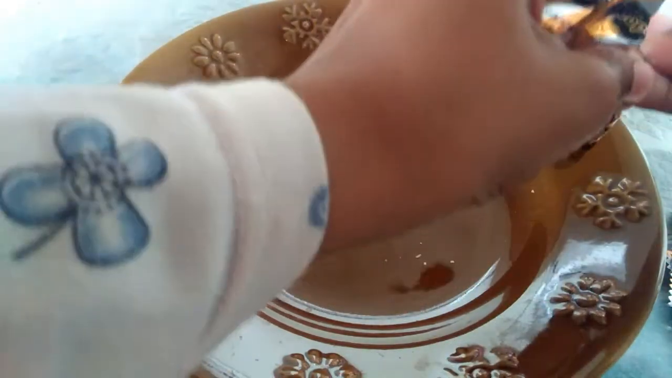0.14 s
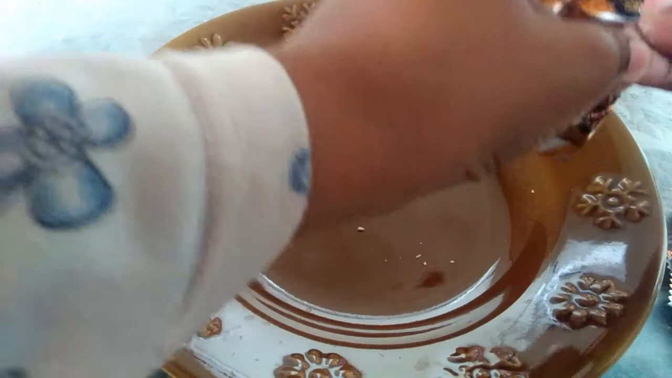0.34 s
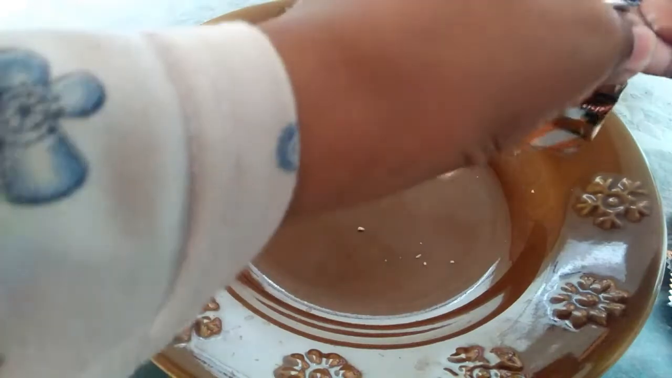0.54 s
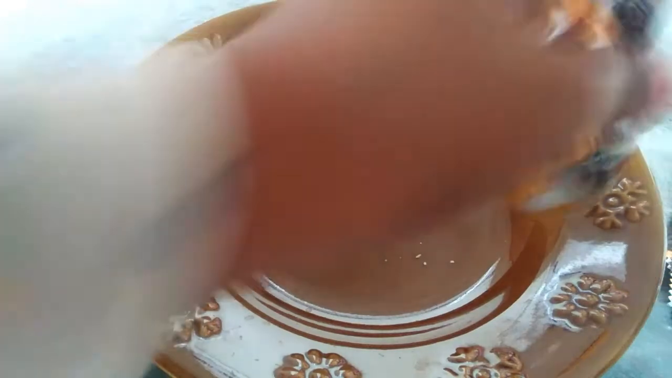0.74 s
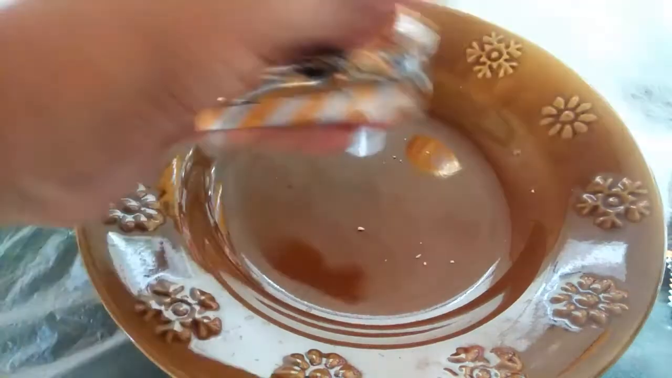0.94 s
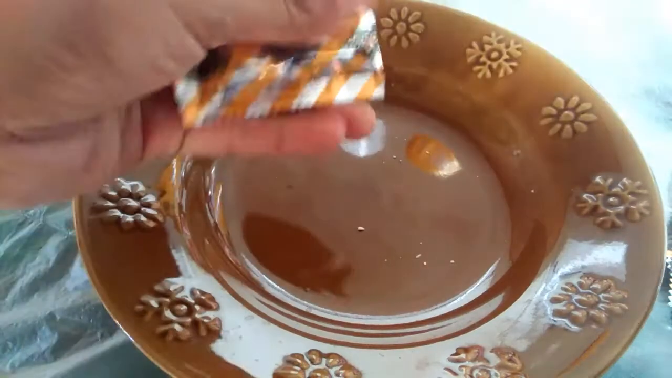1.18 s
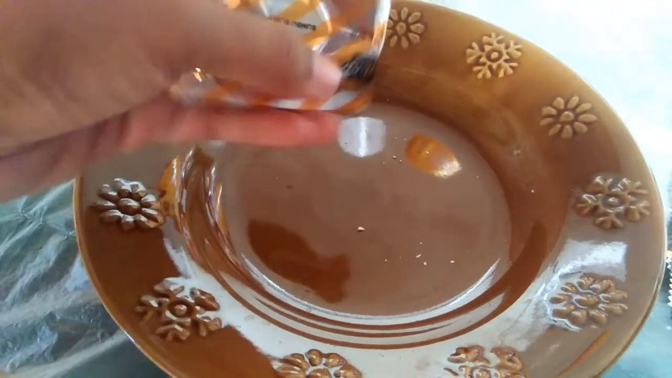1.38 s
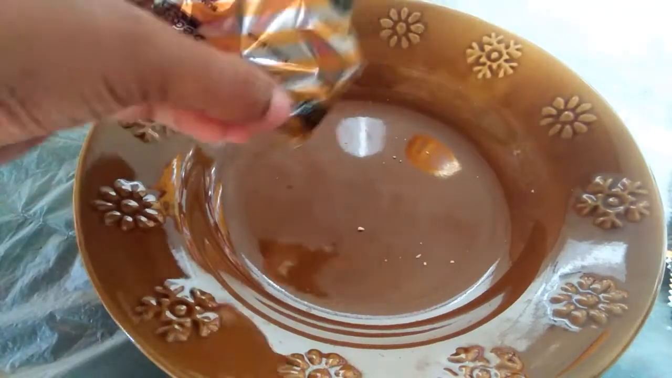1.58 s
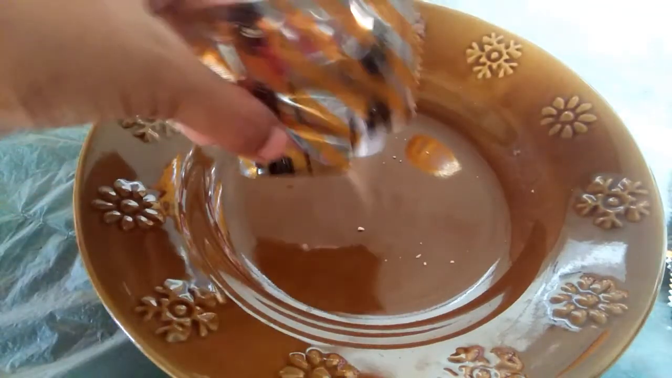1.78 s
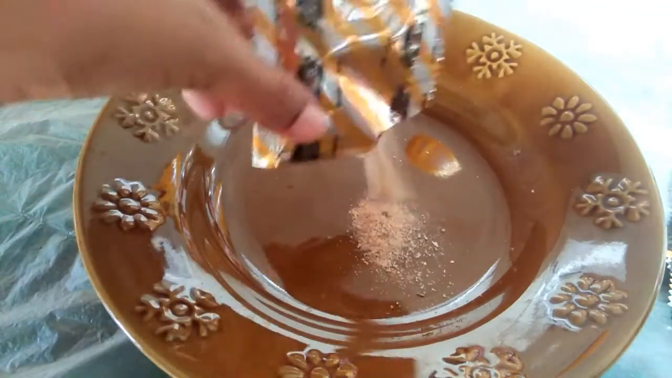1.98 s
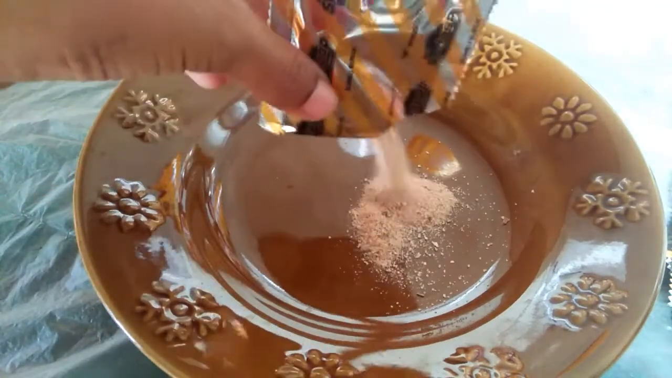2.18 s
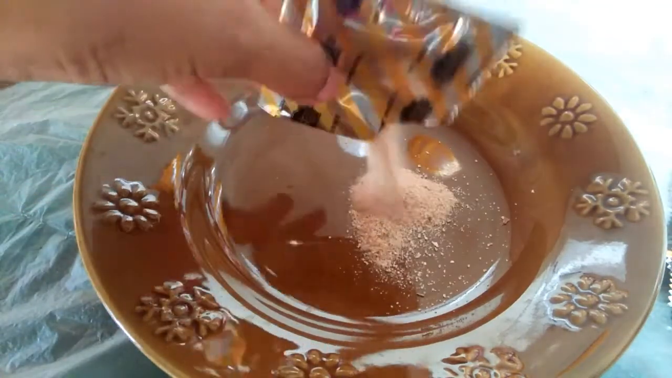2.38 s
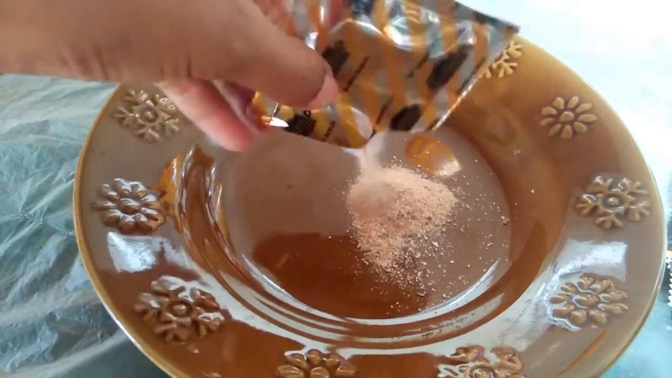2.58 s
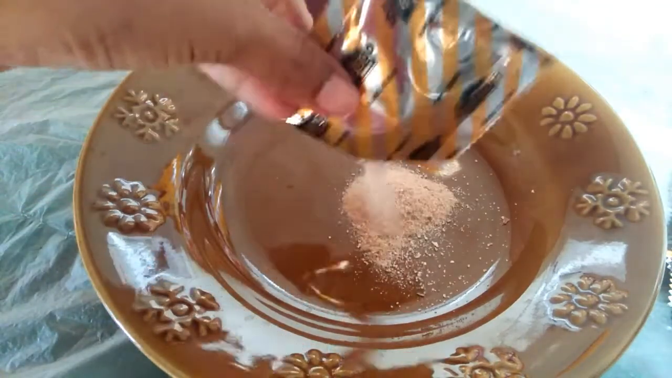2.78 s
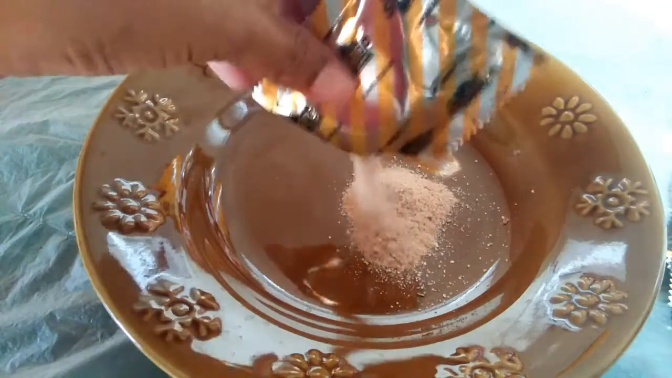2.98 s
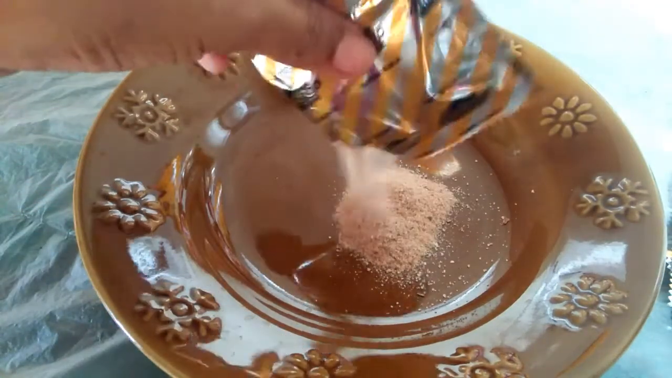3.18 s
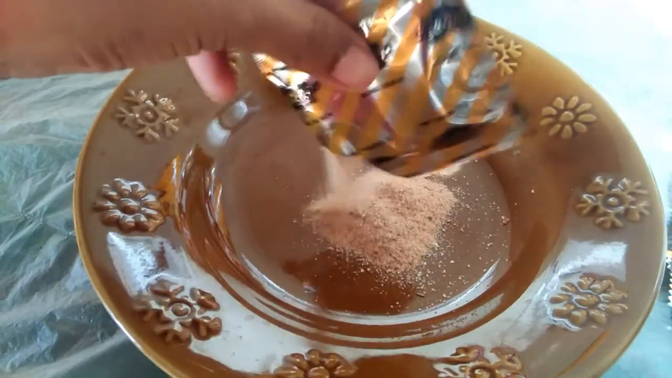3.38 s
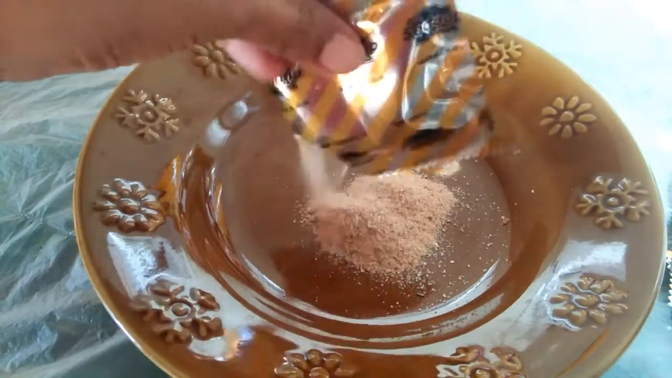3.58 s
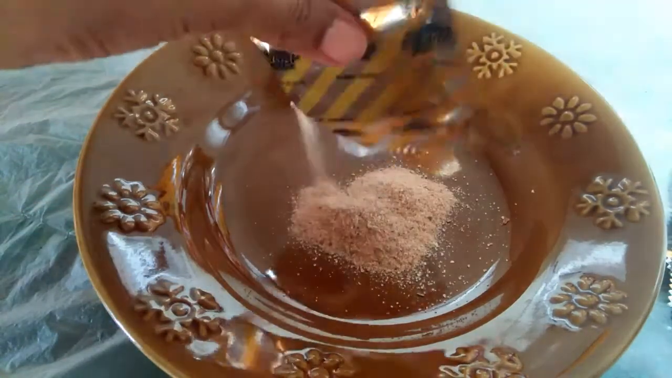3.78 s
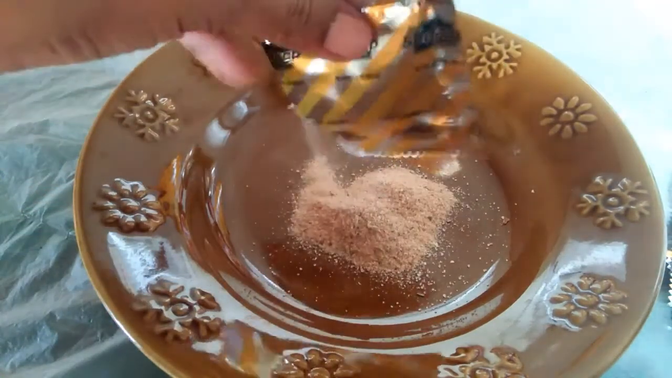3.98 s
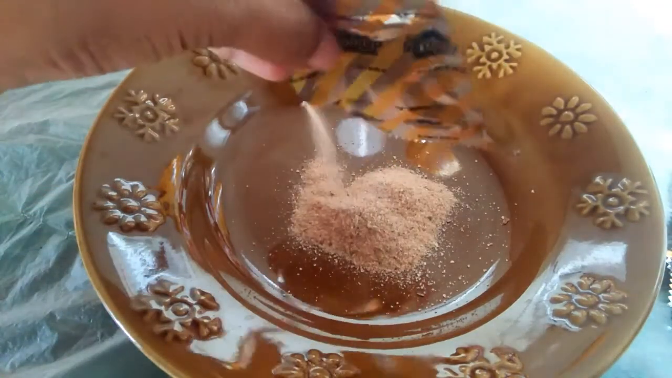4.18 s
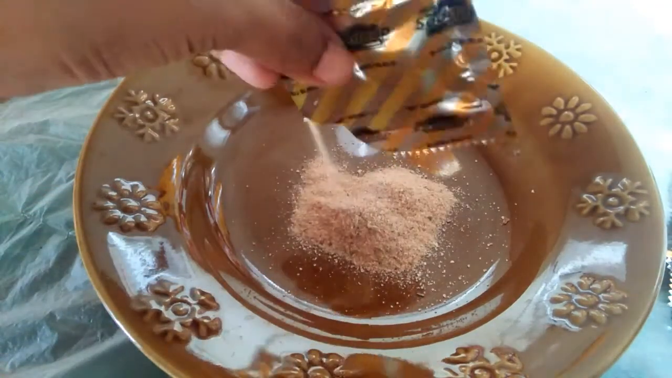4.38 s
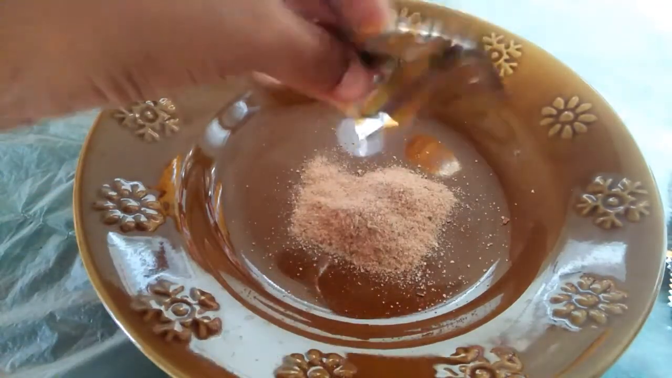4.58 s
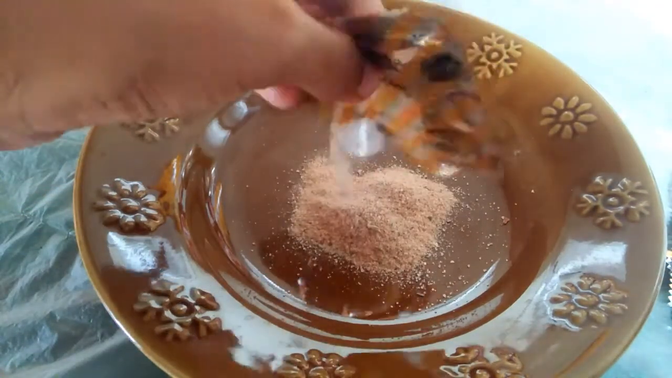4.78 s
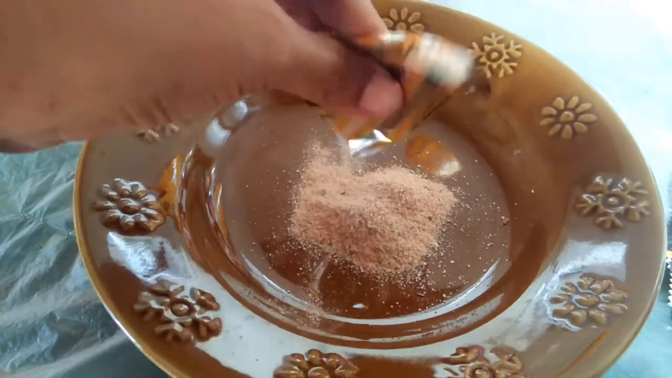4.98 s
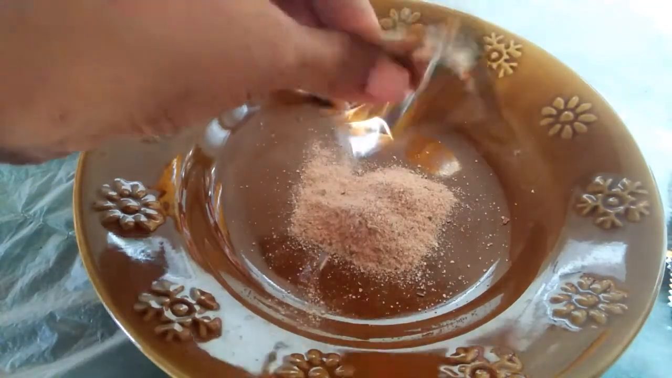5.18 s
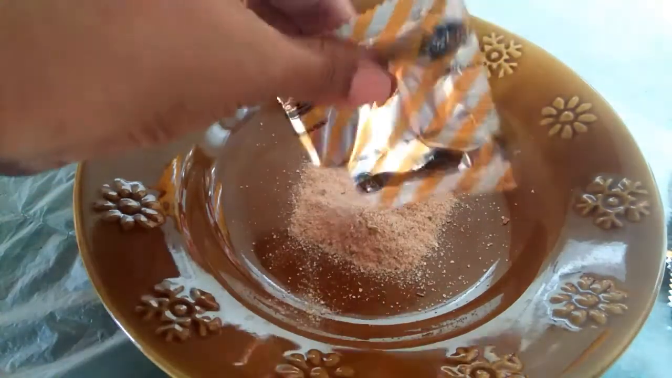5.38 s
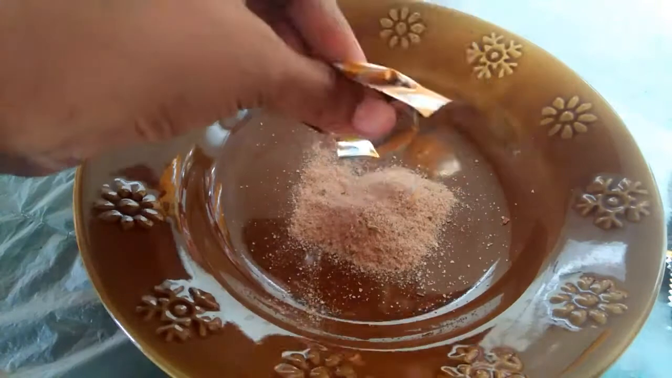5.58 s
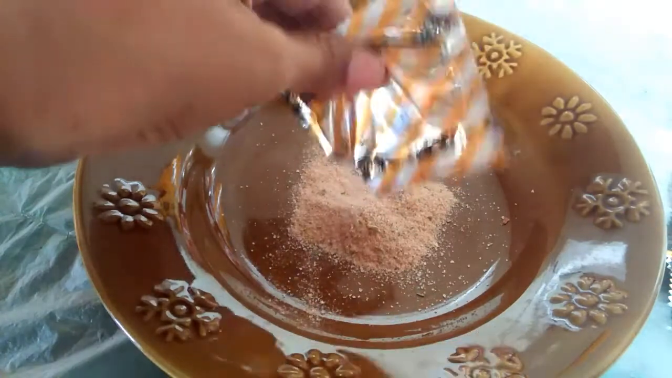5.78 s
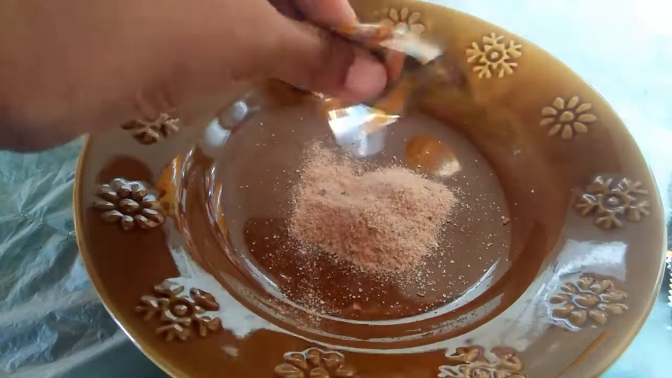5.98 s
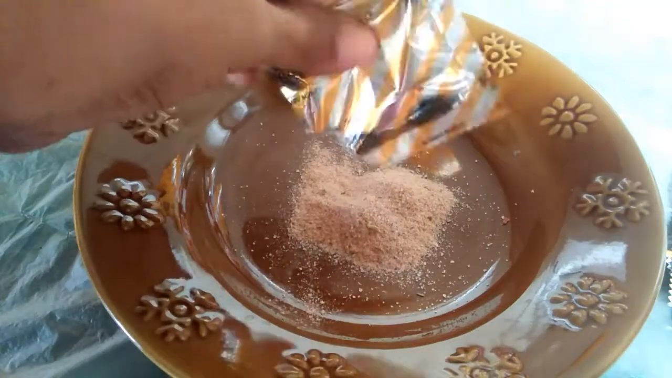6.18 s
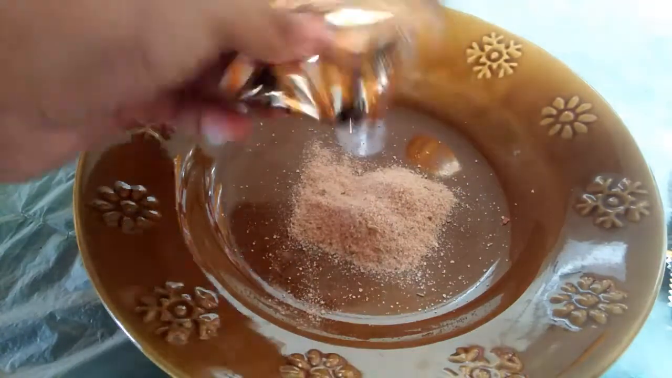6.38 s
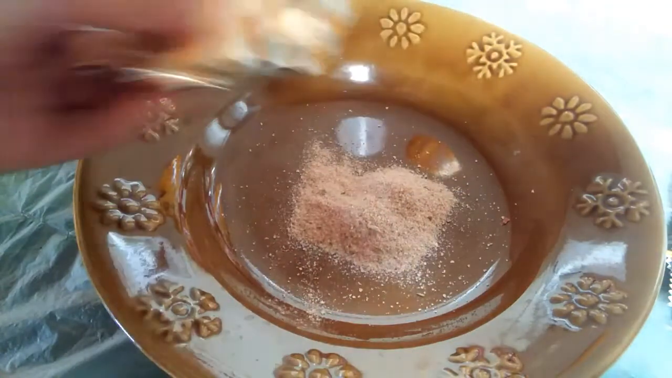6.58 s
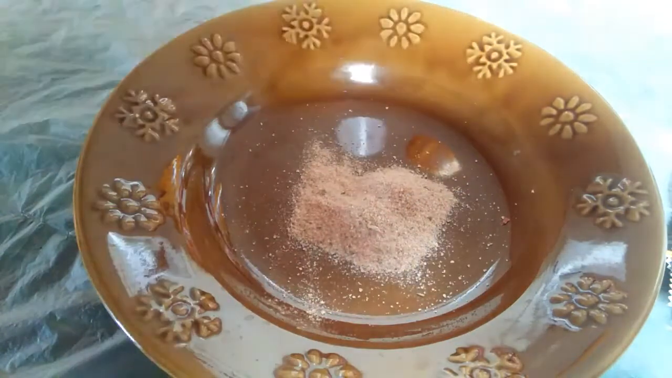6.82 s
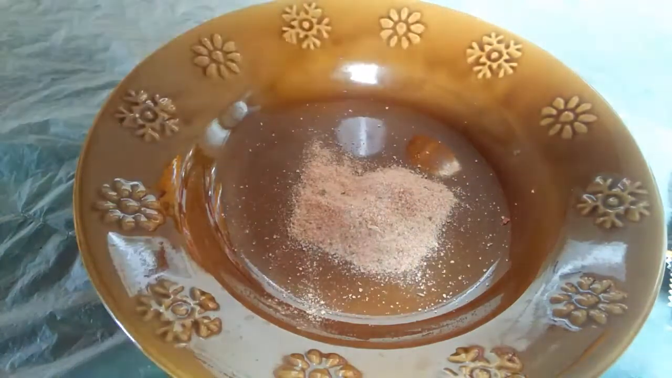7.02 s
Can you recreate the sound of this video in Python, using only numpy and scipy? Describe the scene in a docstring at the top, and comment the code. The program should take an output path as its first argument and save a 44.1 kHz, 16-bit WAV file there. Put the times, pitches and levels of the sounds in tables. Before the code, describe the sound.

Close up, a foil sachet rips open with one sharp snap and bump, powder hisses out softly, then the film crackles brightly as it is shaken.

```python
"""In a kitchen, close to a phone, a foil sachet of seasoning is pulled open, tipped over a plate and shaken
empty. The film buckles in sharp snaps and fine crackle, made of noise bursts shaped by the foil's resonances;
dense random ticks give its rustle and the hiss of powder sliding down it. A low bump comes with the pull, and a
dish, built from decaying modes, knocks on the table. Behind lie a low rumble as the phone shifts in the hand, a
faint wash, one long far call like a rooster's and a fainter falling tone."""
import sys
import numpy as np
from scipy import signal
from scipy.fft import rfft, irfft
from scipy.io import wavfile
from scipy.ndimage import uniform_filter1d

SR = 44100
rng = np.random.default_rng(int(sys.argv[2]) if len(sys.argv) > 2 else 0)


def store_pcm(level_fs):
    """Save levels as 16-bit WAV."""
    pcm = np.round(np.clip(level_fs, -1, 1) * 32767).astype(np.int16)
    wavfile.write(sys.argv[1], SR, np.atleast_2d(pcm).T)


N = 310905
TIME = np.arange(N) / SR

# loudest creases popping through, and at 0.908 s the sharp crack of the dish's hard knock: (t/s, rms level of
# first 4 ms/dB, nominal ring time/ms, facet resonance f/Hz, treble shelf level/dB)
SNAPS = [(0.8204, -45, 1.4, 1800, 1), (0.8421, -9.5, 1.6, 920, 1.5), (0.908, -21.5, 3.6, 1600, -7.5),
         (1.054, -32, 1.7, 11200, -2.5), (1.0587, -34.5, 0.96, 5400, 12), (1.0684, -28.5, 0.55, 4550, 9),
         (1.116, -17, 1, 9800, -7.5), (1.1438, -33, 1.5, 7900, -7), (1.187, -34.5, 2.2, 1780, 1),
         (1.203, -38.5, 4, 1810, -6), (1.319, -34, 3.3, 4800, -3.5), (1.429, -48.5, 2.1, 3700, -6),
         (1.562, -43.5, 1.7, 9440, -13), (1.808, -41.5, 3.7, 9500, -12.5), (1.873, -28, 0.78, 3450, -1.5),
         (2.4333, -38.5, 7.9, 1200, 0), (2.8338, -35, 5.4, 1230, -6), (2.9284, -52.5, 0.95, 8000, -6),
         (3.1084, -52, 1.3, 1400, -4), (3.2693, -34.5, 5, 8000, -1.5), (3.391, -43.5, 5.4, 9150, -2),
         (3.6485, -42.5, 0.92, 8100, -3), (3.8707, -34.5, 2, 6170, 9), (3.886, -31.5, 1.2, 8030, -6),
         (3.984, -42, 1.8, 2800, 1), (4.0069, -39.5, 1.03, 9500, 8), (4.2751, -30, 1.7, 6600, 0),
         (4.3563, -37, 3.3, 1520, -1), (4.4968, -43.5, 3.3, 5900, -1), (4.5595, -41.5, 2.1, 11400, 4),
         (4.6632, -35, 22, 6200, 4), (4.6816, -29.5, 3.9, 3440, 6), (4.7585, -43.5, 2.9, 2780, -7),
         (4.765, -29.5, 1.2, 9800, -8.5), (4.885, -21.5, 0.61, 12200, -1), (4.9861, -28.5, 1.9, 4500, 2),
         (5.05, -29.5, 1.6, 5900, 16), (5.0563, -23.5, 0.92, 10800, -2), (5.071, -25, 0.37, 5700, 0),
         (5.089, -23, 2, 9000, 2.5), (5.144, -37.5, 0.64, 7800, -11), (5.1786, -28, 5.8, 11900, -5),
         (5.3118, -29.5, 2.9, 2570, -4.5), (5.339, -30.5, 9.8, 1190, -5), (5.361, -28.5, 5.4, 6800, -1),
         (5.371, -17.5, 4.6, 13200, -6.5), (5.4198, -22, 3.3, 11700, -7.5), (5.4318, -31, 6.8, 1470, -4),
         (5.444, -21, 1.8, 6230, -7.5), (5.5238, -31.5, 7.6, 3220, 2), (5.6219, -26, 11, 10900, -9),
         (5.6322, -22, 4.2, 1760, 1), (5.6459, -16.5, 3.1, 1290, 6.5), (5.6946, -13.5, 3.2, 5440, -0.5),
         (5.7005, -22.5, 2.9, 12400, -10.5), (5.8609, -19.5, 3, 1240, 2), (5.9019, -20, 3.2, 1680, -4.5),
         (5.925, -27, 3.5, 1750, -10), (6.021, -28.5, 2.7, 4030, 13), (6.0353, -27, 1.5, 9000, -13),
         (6.044, -31.5, 2.3, 8600, 0), (6.0886, -28, 8.8, 1290, -1), (6.1007, -18.5, 4.4, 9300, -8),
         (6.1507, -23.5, 1.3, 4900, 5.5), (6.325, -19.5, 7.6, 1780, 6.5), (6.3771, -21.5, 6.2, 12400, -5),
         (6.396, -18, 0.94, 6170, -9.5), (6.4393, -29, 1.8, 3250, -3), (6.471, -28.5, 1.9, 4000, 6.5),
         (6.512, -33, .9, 4330, 10.5), (6.6119, -33.5, 3.6, 3520, 4), (6.923, -38, .7, 6500, 13.5)]
# base colour of a snap radiated by the film: (f/Hz, level/dB)
FOIL_COLOUR = [(100, -20), (300, -18), (700, -15), (1280, -10), (2400, -11), (4200, -11.5), (5600, -5),
               (7000, -4), (9200, 3), (10400, 0), (11600, -6), (14000, -10), (16000, -24.5)]
# colour of film rubbing: (f/Hz, level/dB)
RUSTLE_COLOUR = [(200, -23), (500, -14), (1250, -11), (2500, -12.5), (4300, -9.5), (6500, -11.5),
                 (9300, -1.5), (11500, -8.5), (14000, -13), (16000, -29.5)]
# colour of grains on foil: (f/Hz, level/dB)
POWDER_COLOUR = [(600, -27), (1300, -17.5), (3000, -18.5), (4000, -21), (5200, -14), (7500, -11),
                 (9200, -2), (11300, -11), (14000, -17), (16000, -28)]
# squeezes and shakes that flex the sachet, before each layer's trim: (t/s, length/s, starting level/dB)
FLEXES = [(0.0, 0.024, -71.5), (0.09, 0.092, -73.5), (0.405, 0.027, -63), (0.72, .03, -74.5),
          (0.848, 0.074, -36.5), (0.93, 0.076, -48.5), (1.12, 0.1, -51.5), (1.29, 0.033, -50),
          (1.41, 0.074, -57), (1.555, 0.025, -55), (1.68, 0.028, -61.5), (4.2, 0.23, -59.5),
          (4.44, 0.22, -63.5), (4.668, 0.046, -46.5), (4.76, 0.094, -47), (4.86, 0.017, -40.5),
          (4.98, 0.059, -50), (5.05, .15, -41.5), (5.295, 0.15, -41.5), (5.49, .05, -46),
          (5.645, 0.09, -38.5), (5.83, 0.094, -38.5), (6.01, 0.022, -42), (6.095, 0.046, -41),
          (6.295, 0.047, -39), (6.38, 0.056, -46.5), (6.49, 0.11, -61.5), (6.625, .03, -50),
          (6.845, 0.025, -49.5), (6.9, .08, -59), (7.045, .01, -50.5)]
FLEX_ATTACK_S, FLEX_SAG_DB_PER_S, FLEX_RELEASE_S = 0.012, 15, 0.027
# powder slides as the sachet is tipped and jogged, before trim: (t/s, length/s, starting level/dB)
SLIDES = [(1.87, 0.17, -53.5), (2.085, 0.036, -57.5), (2.17, 0.186, -82), (2.43, 0.074, -56),
          (2.53, 0.081, -60), (2.69, .11, -59), (2.85, 0.46, -62.5), (3.29, 0.15, -54.5), (3.5, 0.34, -57),
          (3.81, 0.029, -52), (3.88, .14, -59.5)]
SLIDE_ATTACK_S, SLIDE_SAG_DB_PER_S, SLIDE_RELEASE_S = 0.024, 2.5, 0.027
# taut seam giving way between the fingertips: (t/s, rms level of first 4 ms/dB)
SEAM_TICKS = [(0.3235, -38), (0.3953, -36.5), (0.4577, -48)]
# a dish knocking on the table: (t/s, strike level/dB, contact time/ms)
KNOCKS = [(0.901, -22.5, 2.36), (0.9082, -21, 0.42), (0.9195, -37, 0.25)]
# modes of the dish: (f/Hz, level/dB, t60/s)
DISH_MODES = [(174.5, -18.5, 0.37), (310, -2.5, 0.074), (361, -18.5, 0.15), (440, -10.5, 0.13),
              (745, -2.5, 0.041), (850, -4.5, 0.063), (1134, -22, 0.08), (1184, -6.5, 0.043),
              (1593, -24, 0.046), (1880, -13, 0.12), (2220, -18, 0.13)]
# colour of the table's thud: (f/Hz, level/dB)
TABLE_COLOUR = [(50, -7), (170, 2), (330, -11.5), (550, 0), (1300, -9), (2300, -1.5), (4000, -69)]
# far call, swelling and creeping up in pitch, before trim: (t/s, f/Hz, level/dB)
CALL_PATH = [(1.2, 678, -73), (1.45, 683, -65), (1.65, 685, -64), (1.82, 691, -55), (1.98, 696, -56),
             (2.05, 699, -61), (2.13, 706, -57), (2.24, 706, -77)]
# partials of the call: (multiple of its pitch, level/dB)
CALL_PARTIALS = [(1, 1.5), (1.55, -14), (2, -8.5)]
# fainter falling tone, guide pitch ahead of its single partial's multiple: (t/s, f/Hz, level/dB)
FAR_TONE_PATH = [(3.7, 1330, -73), (4.05, 1324, -83), (4.23, 1157, -69.5), (4.3, 964, -69.5),
                 (4.55, 916, -80)]
# colour of the quiet wash: (f/Hz, level/dB)
WASH_COLOUR = [(40, 1.5), (130, -2), (200, -12), (290, 0), (400, -8.5), (800, -4), (1300, -9),
               (2200, -17.5), (4000, -27), (9000, -28), (16000, -32)]
# colour of the low rumble: (f/Hz, level/dB)
RUMBLE_COLOUR = [(22, -18), (40, -3), (58, 8), (85, -3.5), (130, -11), (300, -37), (900, -55.5)]
# spells added to the resting rumble: (t/s, length/s, starting level/dB)
RUMBLE_SPELLS = [(0.0, 0.061, -58), (1.1, 1.33, -64.5), (3.05, 1.08, -61.5), (4.62, 2.3, -66.5)]
RUMBLE_ATTACK_S, RUMBLE_SAG_DB_PER_S, RUMBLE_RELEASE_S, RUMBLE_REST_DB = 0.05, 1.5, 0.065, -72.5

BODY_DB, BODY_PER_BRIGHT = 0.5, 0.45  # a brighter snap also shakes the body of the sachet harder
LEAD_S = 0.007  # time constant of the swell before a snap
TOP_HZ = 16000


def amp(db):
    """Decibels to gain."""
    return 10 ** (np.asarray(db) / 20)


def unit(x):
    """Scale to rms 1."""
    return x / np.sqrt(np.mean(x ** 2) + 1e-20)


def add(out, s, sound):
    """Mix a sound in at a given time."""
    start = int(s * SR)
    out[start:start + len(sound)] += sound[:N - start]


def gain_curve(rows):
    """Gain along (t/s, level/dB) rows, practically silent outside them."""
    return amp(np.interp(TIME, *np.transpose(rows), left=-140, right=-140))


def walk(rate):
    """Smoothed random drift of rms 1, with `rate` new targets per second."""
    hold = int(SR / rate)
    steps = np.repeat(rng.standard_normal(N // hold + 1), hold)[:N]
    return unit(uniform_filter1d(uniform_filter1d(steps, hold), hold))


def response(points, extra_db=0, size=1024):
    """Minimum-phase impulse response with the colour of (f/Hz, level/dB) points."""
    hz, db = np.transpose(points)
    bins = np.maximum(np.fft.rfftfreq(size, 1 / SR), 1)
    colour_db = np.interp(np.log(bins), np.log(hz), db) + extra_db
    # folding the cepstrum gathers the energy at the onset
    cepstrum = irfft(np.log(amp(colour_db)))
    cepstrum[1:size // 2] *= 2
    cepstrum[size // 2 + 1:] = 0
    return irfft(np.exp(rfft(cepstrum)))


def convolve(x, impulse):
    """Filter, keeping the length."""
    return signal.fftconvolve(x, impulse)[:len(x)]


def grains(per_second, spread_db, cap_db):
    """Random ticks of either sign: very many small ones and a few large."""
    size_db = np.minimum(spread_db * rng.exponential(size=N), cap_db)
    happens = rng.random(N) < per_second / SR
    return happens * rng.choice([-1, 1], N) * amp(size_db)


def strokes(rows, attack_s, sag_db_per_s, release_s):
    """Gain of (t/s, length/s, level/dB) movements: each builds up to t, sags while it lasts and dies away."""
    power = np.zeros(N)
    for s, length, db in rows:
        early = np.maximum(s - TIME, 0)
        late = np.maximum(TIME - s - length, 0)
        held = amp(db - sag_db_per_s * np.clip(TIME - s, 0, length))
        edges = np.exp(-2 * np.minimum(early / attack_s + late / release_s, 20))
        power += held ** 2 * edges
    return np.sqrt(power)


def snap(ring_ms, facet_hz, body_db, bright_db, facet_db=7.0,
         trail_db=-25, trail_s=0.01, rise_s=0.00032, size=2048):
    """A crease pops through and rings its facet; the slower, lower waves linger and spread over the sachet."""
    t = np.arange(size) / SR
    hz = np.fft.rfftfreq(size, 1 / SR) + 1
    ring_s = max(ring_ms, .3) / 1000
    noise = rng.standard_normal(size)
    low = signal.sosfilt(signal.butter(2, 4500, fs=SR, output="sos"), noise)
    high = noise - low
    rattle = high * np.exp(-t / (.75 * ring_s)) + low * np.exp(-t / (1.15 * ring_s))
    trail = amp(trail_db) * noise * np.exp(-t / trail_s)
    burst = (rattle + trail) * (1 - np.exp(-t / rise_s))
    facet = facet_db * np.exp(-(np.log2(hz / facet_hz) / .28) ** 2)
    body_shelf = body_db / (1 + (hz / 3000) ** 6)
    treble_shelf = bright_db / (1 + (7500 / hz) ** 8)
    sound = convolve(burst, response(FOIL_COLOUR, facet + body_shelf + treble_shelf, size=size))
    return sound / np.sqrt(np.mean(sound[:SR // 250] ** 2))  # rms 1 over the first 4 ms


def creases(lead_db=-32.5, size=1764):
    """The loud snaps; a short, faint swell of spiky noise leads into each snap."""
    out = np.zeros(N)
    swell = np.exp((np.arange(size) - size) / SR / LEAD_S)
    for s, db, ring_ms, facet_hz, bright_db in SNAPS:
        # cubing makes the noise spiky
        lead_noise = unit(convolve(rng.standard_normal(size) ** 3, response(RUSTLE_COLOUR)))
        add(out, s - size / SR, amp(db + lead_db) * swell * lead_noise)
        body_db = BODY_DB + BODY_PER_BRIGHT * bright_db
        add(out, s, amp(db) * snap(ring_ms, facet_hz, body_db, bright_db))
    return out


def crackle(drive, level_db=0.0, spread_db=4.0, count=640):
    """Small creases give way at random, as hard as the film is driven."""
    out = np.zeros(N)
    places = rng.integers(0, N, count)
    for place, (size, pitch, body, bright) in zip(places, rng.standard_normal((count, 4))):
        tick = snap(1.1, 5500 * 2 ** (.8 * pitch), 3 * body, 3 * bright)
        add(out, place / SR, drive[place] * amp(level_db + spread_db * min(size, 2)) * tick)
    return out


def rustle(flex, level_db=-2.5):
    """Film rubs on film and on the fingers in dense, uneven ticks."""
    ticks = grains(7000, spread_db=4, cap_db=20) * amp(1.5 * walk(80))
    return unit(convolve(ticks, response(RUSTLE_COLOUR))) * flex * amp(level_db)


def powder(flow, level_db=1.0):
    """Fine grains skid down the foil in an uneven stream."""
    ticks = grains(11000, spread_db=3.6, cap_db=19) * amp(1.5 * walk(60))
    return unit(convolve(ticks, response(POWDER_COLOUR))) * flow * amp(level_db)


def seam(ring_hz=2700, body_db=0.0):
    """Stretched tight, the sealed edge gives short, dry, dark ticks."""
    out = np.zeros(N)
    for s, db in SEAM_TICKS:
        add(out, s, amp(db) * snap(1.3, ring_hz, body_db, -7, facet_db=13))
    return out


def bump(s=0.8352, level_db=-7.0, push_s=0.0026, bass_cut_hz=56, drain_hz=50, size=8192):
    """The hand jerks free and shoves air at the microphone, whose resonant bass cut swings a few times."""
    t = np.arange(size) / SR
    push = -np.sin(np.pi * np.minimum(t / push_s, 1)) ** 2
    w = 2 * np.pi * bass_cut_hz
    swing = signal.lfilter(*signal.bilinear([1, 0, 0], [1, w / 2, w * w], SR), push)
    drain = signal.butter(1, drain_hz, "high", fs=SR, output="sos")
    out = np.zeros(N)
    add(out, s, amp(level_db) * signal.sosfilt(drain, swing))
    return out


def dish(thud_db=-9.0, thud_t60=0.14, crack_db=1.0, crack_s=0.0073, crack_hz=1750, size=22050):
    """A soft contact, a hard one and a rebound ring the dish; the table thuds, and hard contacts crack."""
    t = np.arange(size) / SR
    ring = sum(amp(db - 60 * t / t60) * np.sin(2 * np.pi * hz * t) for hz, db, t60 in DISH_MODES)
    table_noise = unit(convolve(rng.standard_normal(size), response(TABLE_COLOUR)))
    thud = table_noise * amp(thud_db - 60 * t / thud_t60)
    octave = [crack_hz / np.sqrt(2), crack_hz * np.sqrt(2)]
    band = signal.butter(2, octave, "band", fs=SR, output="sos")
    crack = unit(signal.sosfilt(band, rng.standard_normal(size))) * amp(crack_db) * np.exp(-t / crack_s)
    out = np.zeros(N)
    for s, db, contact_ms in KNOCKS:
        # a longer push smooths away more of the treble
        push = np.sin(np.pi * np.minimum(1000 * t / contact_ms, 1))
        add(out, s, amp(db) * convolve(ring + thud + crack, push / push.sum()))
    return out


def tail(t60_low, t60_high, wall_s=.012, wall_gain=2.0, size=44100):
    """Reflections of unit energy: a cluster from the nearest walls, then a wash with its own treble decay."""
    t = np.arange(size) / SR
    noise = rng.standard_normal(size)
    low = signal.sosfilt(signal.butter(2, 3000, fs=SR, output="sos"), noise)
    decay = low * amp(-60 * t / t60_low) + (noise - low) * amp(-60 * t / t60_high)
    cluster = 1 + wall_gain * np.exp(-np.abs(t - wall_s) / 0.0023)
    arrival = np.where(t < wall_s, .6 * t / wall_s, cluster)
    return unit(decay * arrival) / np.sqrt(size)


def far_call(rows, partials, level_db=-1.0):
    """One held, hoarse tone that flutters as it comes through the air and is smeared by walls."""
    s, hz, db = np.transpose(rows)
    flutter = 1 + .016 * walk(110) + .006 * walk(18)
    pitch = np.interp(TIME, s, hz) * flutter
    phase = 2 * np.pi * np.cumsum(pitch) / SR
    tone = sum(amp(part_db + 3.5 * walk(30)) * np.sin(k * phase) for k, part_db in partials)
    call = unit(tone) * gain_curve(np.c_[s, db])
    return amp(level_db) * (call + convolve(call, tail(.3, .25)))


def room_tone(wash_db=-67.5):
    """A faint, restless wash from outside and a low rumble that comes in uneven bumps."""
    wash = unit(convolve(rng.standard_normal(N), response(WASH_COLOUR, size=8192)))
    rumble = unit(convolve(rng.standard_normal(N), response(RUMBLE_COLOUR, size=8192)))
    # three octaves of the wash each swell by themselves
    for hz in (180, 360, 720):
        band = signal.sosfiltfilt(signal.butter(2, [hz, 2 * hz], "band", fs=SR, output="sos"), wash)
        wash = wash + band * (amp(1.7 * walk(10)) - 1)
    bumps_db = 3 * walk(22)
    spells = strokes(RUMBLE_SPELLS, RUMBLE_ATTACK_S, RUMBLE_SAG_DB_PER_S, RUMBLE_RELEASE_S)
    rumble_gain = (amp(RUMBLE_REST_DB) + spells) * amp(bumps_db)
    return wash * amp(wash_db) + rumble * rumble_gain


def scene(wet_db=-14.5, pour_drive_db=-3.5):
    """The sachet and dish close by, the kitchen's ring and the background."""
    flex = strokes(FLEXES, FLEX_ATTACK_S, FLEX_SAG_DB_PER_S, FLEX_RELEASE_S)
    flow = strokes(SLIDES, SLIDE_ATTACK_S, SLIDE_SAG_DB_PER_S, SLIDE_RELEASE_S)
    drive = flex + amp(pour_drive_db) * flow  # the crackle follows the pouring too
    near = creases() + crackle(drive) + rustle(flex) + powder(flow) + seam() + dish()
    kitchen = amp(wet_db) * convolve(near, tail(t60_low=0.48, t60_high=0.3))
    outside = far_call(CALL_PATH, CALL_PARTIALS) + far_call(FAR_TONE_PATH, [(0.98, 0)], level_db=0.0)
    return (near + kitchen + bump() + outside + room_tone())[None]


def record(dry):
    """The phone cuts the deepest bass, clips at full scale and cuts the top."""
    x = signal.sosfilt(signal.butter(2, 22, "high", fs=SR, output="sos"), dry)
    clipped = np.clip(x, -1, 1)
    return signal.sosfilt(signal.ellip(8, .2, 70, TOP_HZ, fs=SR, output="sos"), clipped)


dry = scene()
out = record(dry)
store_pcm(out)
```